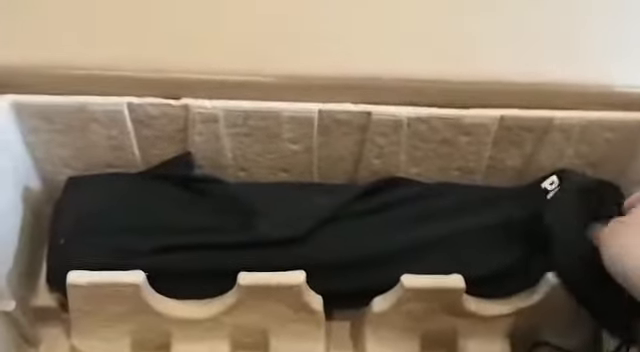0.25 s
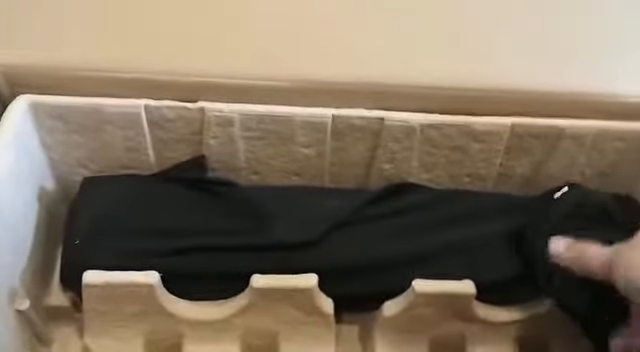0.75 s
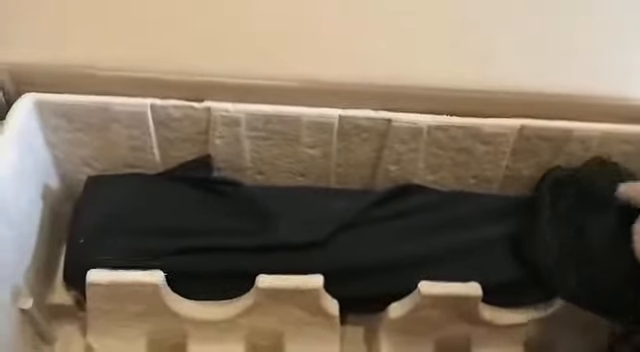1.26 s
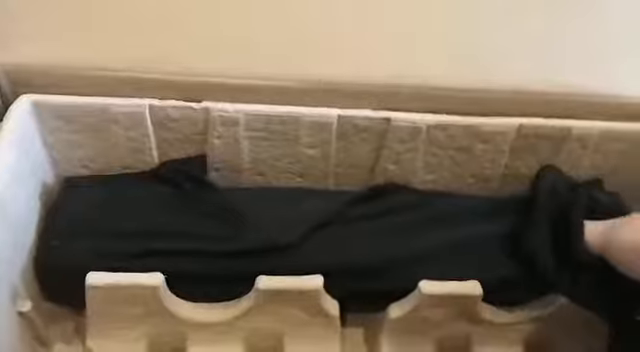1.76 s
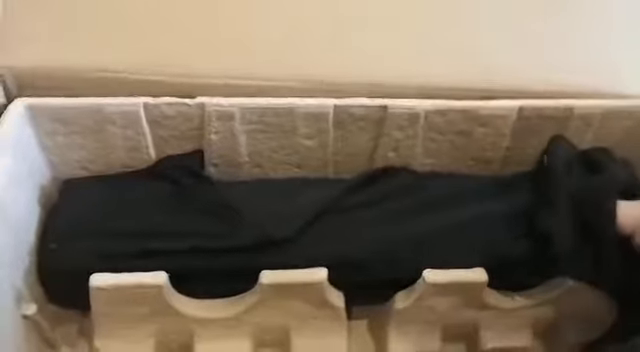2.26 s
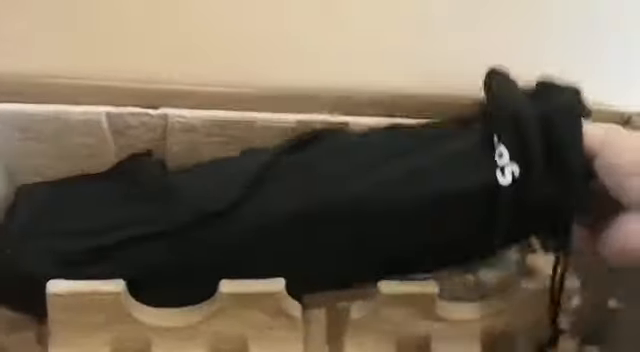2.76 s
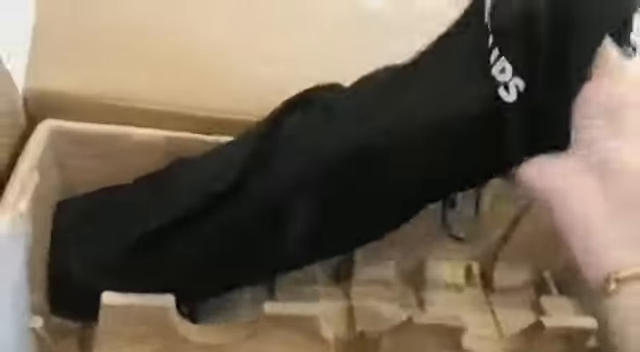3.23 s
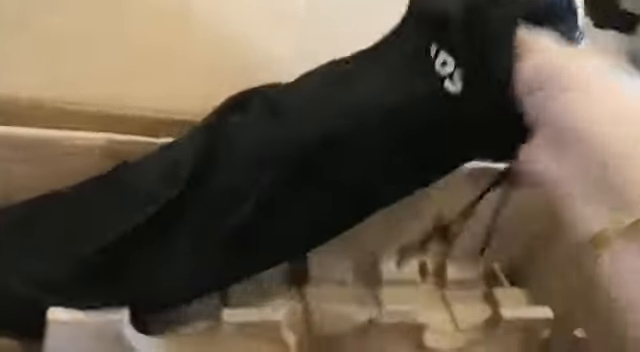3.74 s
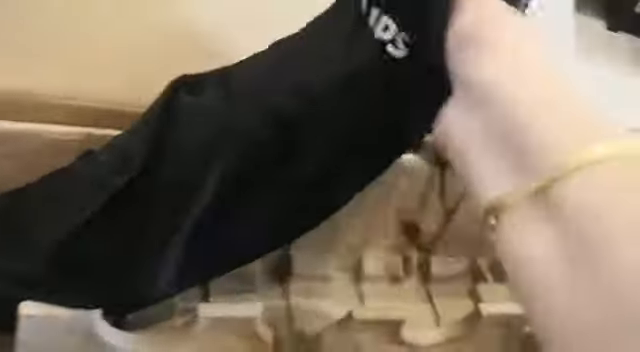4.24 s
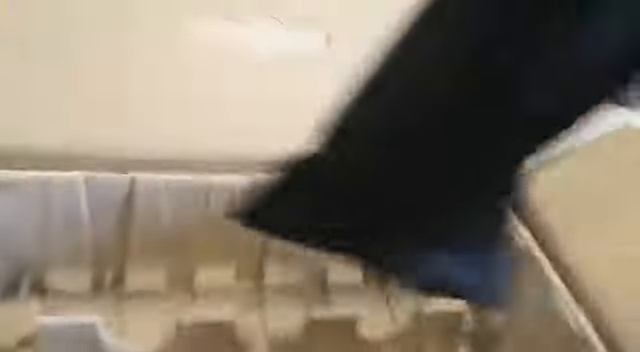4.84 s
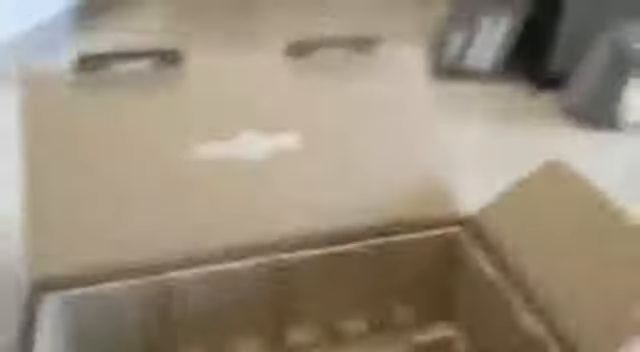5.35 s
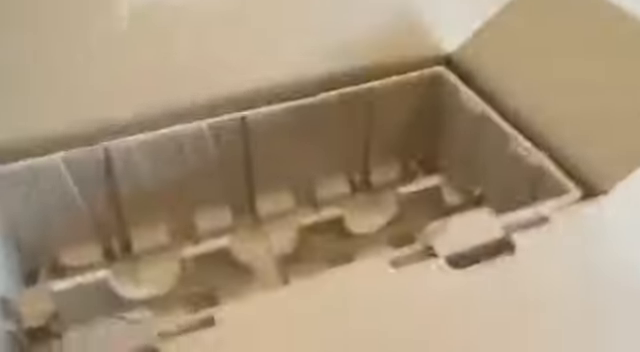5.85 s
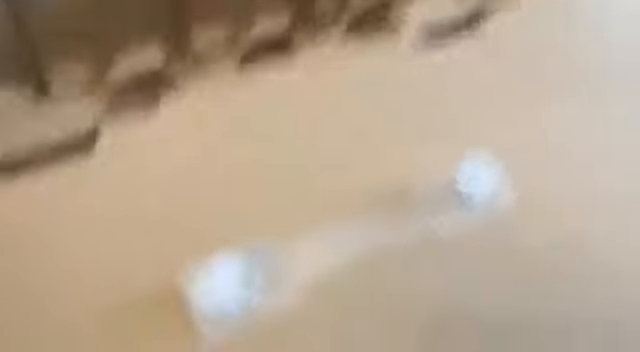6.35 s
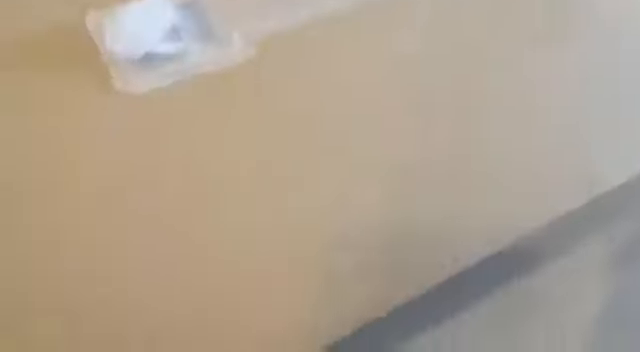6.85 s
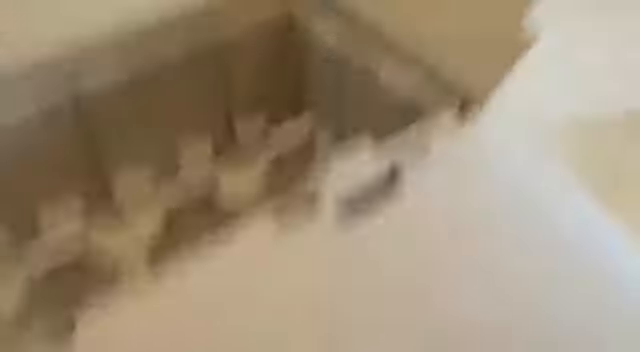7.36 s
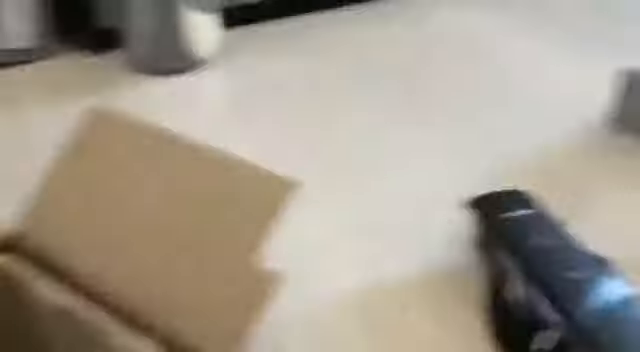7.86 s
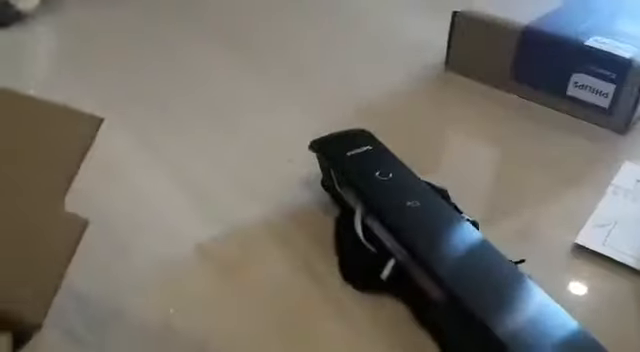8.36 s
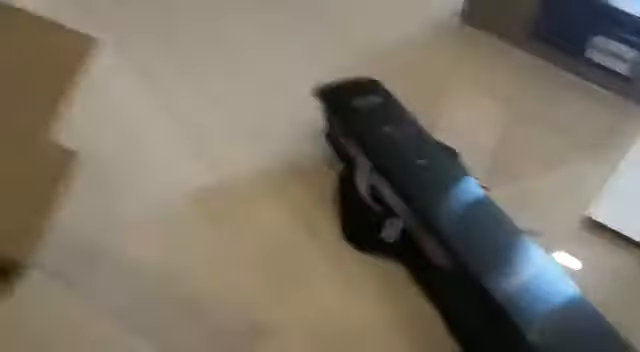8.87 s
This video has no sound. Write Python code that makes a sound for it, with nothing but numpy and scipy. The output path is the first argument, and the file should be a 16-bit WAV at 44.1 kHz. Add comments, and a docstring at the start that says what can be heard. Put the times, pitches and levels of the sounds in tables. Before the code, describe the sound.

Soft cloth rubs, dull cardboard thuds and light ticks up close, interrupted by four hard cracks and one hollow knock off to the right.

```python
"""Four sharp knocks and a hollow one land off to the right: noise bursts through body modes, then a room ring.
They fall while a cloth bag is lifted out of a cardboard box with a pulp tray, close to a hand-held phone.
Near by, decaying noise makes taps and scrapes, and sines with noise make the thuds of the box walls.
Flickering noise makes the sliding cloth and board; slower noise flexes the box and rumbles under the hand.
Behind lie steady air noise and a faint appliance of noise and wavering sines."""
import sys
import numpy as np
from scipy import signal
from scipy.fft import rfft, irfft
from scipy.io import wavfile
from scipy.ndimage import uniform_filter1d

SR = 44100
rng = np.random.default_rng(int(sys.argv[2]) if len(sys.argv) > 2 else 0)


def digitize_waveform(pressure):
    """Quantize a signal to 16-bit integers and store it at the path in sys.argv[1].

    Rows of a 2-D input are taken as channels; values are limited to [-1, 1].
    """
    field = np.atleast_2d(pressure).T
    bounded = np.clip(field, -1, 1)
    quanta = np.round(bounded * 32767).astype(np.int16)
    wavfile.write(sys.argv[1], SR, quanta)


N = 401310
TIME = np.arange(N) / SR  # s, whole scene
AGE = TIME[:SR]  # s, since the start of one short event
TOUCH_S = .0022  # from first touch to full contact of a knock


# hard knocks, with the balance of each blow and two rings of the struck spot:
# contact_s, level_db, thump_db, woody_middle_db, treble_db, ring1_hz, ring1_db, ring2_hz, ring2_db
HARD_KNOCKS = [(2.427, -16, 2, 13, 6, 1844, 9, 7500, 5), (2.8590, -16, -4, 7, 0.5, 1770, 5, 3670, 4.5),
               (5.0774, -13.5, -3, 0.5, -2, 1460, 3.5, 2830, 7),
               (5.5210, -18.5, 0.5, -13.5, 1, 998, 19.5, 2450, -1.5)]
# broad response of the knocked body: frequency_hz, level_db
BODY_RESPONSE = [(50.0, -17), (110.0, -5.5), (250.0, -9), (420.0, -5.5), (600.0, -15.5), (850.0, -3.5),
                 (2000.0, 0.5), (3500.0, -2), (5500.0, -6), (8300.0, -9.5), (10500.0, -18),
                 (15000.0, -19.5)]
# modes of the knocked body: frequency_hz, width_hz, above_broad_response_db
BODY_MODES = [(174, 50, 10.5), (325.4, 110, 11), (526, 9.9, 5), (865, 9.6, 6), (1070, 57, 2.5),
              (1371, 24, -2.5), (1430, 18, 1.5), (1793, 150, 2), (2150, 160, 0.5), (2406, 240, 4),
              (2625, 190, 6), (2880, 240, 2.5), (3050, 72.0, 6.5), (3700, 180, 2.5), (4164, 250, 5.5),
              (4450, 68, -0.5), (4637, 227.0, 6.5), (4880, 180, 4), (6000.0, 70, -0.5), (6900, 300, 4.5),
              (7487, 450, 10.5), (7800, 194.0, 1.5), (8440, 190, 4.5), (9250, 390, 7.5)]


def hard_knocks():
    """Four blows on one body; the place and force of each shift the balance of its modes."""
    out, hz = np.zeros((2, N)), bins(SR)
    body_db = response(BODY_RESPONSE, BODY_MODES)
    for s, db, thump_db, middle_db, treble_db, hz1, db1, hz2, db2 in HARD_KNOCKS:
        thump = thump_db * bump(hz, 240, 380)
        middle = middle_db * bump(hz, 950, 500)
        treble = treble_db * hz ** 2 / (hz ** 2 + 5500 ** 2)
        spot = db1 * bump(hz, hz1, 250) + db2 * bump(hz, hz2, 350)
        # coarse unevenness fades in toward 1500 Hz, fine unevenness is everywhere
        uneven_db = 1.4 * ripple(110) * np.minimum(hz / 1500, 1) + 1.3 * ripple(30)
        knock = ring(blow(), body_db + thump + middle + treble + spot + uneven_db)
        add(out, s - TOUCH_S, undb(db) * knock)
    return out


# broad response of the large panel: frequency_hz, level_db
PANEL_RESPONSE = [(50.0, -38), (110.0, -10.5), (250.0, 2.5), (420.0, -10), (600.0, -27), (850.0, -22),
                  (2000.0, -11), (3500.0, -14), (5500.0, -15.5), (8300.0, -21.5), (10500.0, -29.5),
                  (15000.0, -34.5)]
# modes of the large panel: frequency_hz, width_hz, above_broad_response_db
PANEL_MODES = [(231.0, 68.0, -1), (366, 71, 8), (852.0, 167.0, 9), (1268.0, 208.0, 7.5),
               (2928.0, 470, 11.5), (3280, 341.0, 11), (4306.0, 396.0, 3.5), (6489.0, 590.0, 4),
               (7370, 552.0, 9)]


def hollow_knock(contact_s=6.5675, level_db=-14):
    """One blow on a large panel, whose strong low response sounds hollow."""
    out = np.zeros((2, N))
    knock = ring(blow(), response(PANEL_RESPONSE, PANEL_MODES))
    add(out, contact_s - TOUCH_S, undb(level_db) * knock)
    return out


def blow(crack_db=5, crack_t60=0.022, touch_db=-11, wall_db=3, wall_s=.0056, wall_t60=0.041, room_db=-0.5):
    """An edge touches, the face cracks from the right, the left wall echoes, then the room rings."""
    crack = place(rng.standard_normal(SR) * fade(crack_t60), pan_db=-7, lag_s=.0005)
    wall_decay = np.roll(fade(wall_t60), int(wall_s * SR))
    walls = diffuse(SR) * wall_decay * undb([[0], [-2]])  # 2 dB weaker on the right
    landing = undb(crack_db) * crack + undb(wall_db) * walls + undb(room_db) * room_tail(build_s=0.0049)
    touch = place(rng.standard_normal(SR) * fade(.02), pan_db=-6, lag_s=.0005)
    return undb(touch_db) * touch + np.roll(landing, int(TOUCH_S * SR), axis=1)


# ring of the hard-floored room: frequency_hz, t60_s
ROOM_DECAY = [(100, .63), (260, 0.69), (700, 0.74), (1840, 0.66), (4850, 0.61), (8000, 0.57), (13000, 0.41)]


def room_tail(build_s):
    """Reflections thicken, then each band dies at its own rate."""
    noise = rfft(diffuse(SR))
    centres, t60s = np.transpose(ROOM_DECAY)
    tail = 0
    for weights, t60 in zip(np.eye(len(t60s)), t60s):
        # each band overlaps its neighbours, and the bands add up to the whole noise
        band = along(np.c_[centres, weights], bins(SR))
        tail = tail + irfft(noise * band) * fade(t60)
    return tail * (1 - np.exp(-AGE / build_s))


# strokes of cloth over board: middle_s, length_s, cloth_hiss_db, rubbed_board_db, flexing_box_db
CLOTH_STROKES = [(.12, 0.11, -64, -58.5, -52), (.50, 0.27, -53, -51, -46), (.70, 0.11, -63.5, -55.5, -51),
                 (1.13, 0.19, -48, -50.5, -47), (1.315, 0.1, -55, -50.5, -46.5),
                 (1.47, 0.086, -59, -55.5, -56), (1.77, 0.24, -56.5, -45, -50),
                 (2.2, 0.13, -60, -54.5, -56), (2.39, 0.14, -53, -48.5, -45.5),
                 (3.48, 0.43, -53.5, -57, -63.5), (4.26, 0.22, -57, -59, -72),
                 (4.83, 0.069, -73.5, -58, -66), (6.26, 0.14, -53.5, -53.5, -53),
                 (6.48, 0.13, -76.5, -58, -56), (7.02, 0.53, -63.5, -56.5, -58),
                 (7.25, 0.15, -57, -65, -59), (8.32, 0.48, -51, -49, -53.5), (8.52, 0.39, -82, -57.5, -59),
                 (8.97, 0.46, -71, -63, -52.5)]
# colour of the cloth hiss: frequency_hz, level_db
CLOTH_COLOUR = [(1200, -28), (2800, 5), (5000, 3), (7800, 0.5), (10000, -13.5), (15000, -23)]
# colour of the rubbed board: frequency_hz, level_db
BOARD_COLOUR = [(250, -9.5), (600, -5.5), (950, 0.5), (1400, -2.5), (1950, 3.5), (2800, -2), (5000, -30.5)]


def sliding(rest_cloth_db=-72, rest_board_db=-62):
    """Fibres catch and slip in tiny grains; the board under them answers lower."""
    hiss = effort(CLOTH_STROKES, 0, rest_cloth_db)
    rub = effort(CLOTH_STROKES, 1, rest_board_db)
    # fast grains ride on slower unevenness
    cloth = wash(CLOTH_COLOUR) * undb(0.97 * walk(640) + .6 * walk(44))
    board = wash(BOARD_COLOUR) * undb(1.4 * walk(250) + 2.0 * walk(30))
    return hiss * banded(cloth, depth_db=1.8) + rub * banded(board, depth_db=1.8)


# scrapes of the bag and hand on cardboard: start_s, level_db, centre_hz, sharpness (no unit), rise_s, t60_s
BROAD_SCRAPES = [(1.294, -37.5, 1530, 1.6, 0.013, 0.15), (1.606, -44, 2020, 0.922, 0.089, 0.41),
                 (1.710, -39.5, 3700, 1.05, .014, 0.38), (1.845, -43, 1740, 0.73, 0.033, 0.13),
                 (3.054, -29, 1940, 0.96, 0.0032, 0.6), (4.350, -44, 1610, 0.68, 0.017, 0.43)]


def scrapes():
    """The bag catches in grainy slips, heard through a broad band of the board."""
    out, hz = np.zeros((2, N)), bins(SR)
    for s, db, centre, sharpness, rise_s, t60 in BROAD_SCRAPES:
        colour_db = 2 * band_db(hz, centre, sharpness) + along(SOFT_TREBLE, hz) + 2 * ripple(200)
        add(out, s, undb(db) * ring(friction(rise_s, t60), colour_db))
    return out


# rubs with three narrow rings of the board:
# start_s, level_db, rise_s, t60_s, lower_ring_hz, main_ring_hz, upper_ring_hz, upper_ring_db
RINGING_RUBS = [(1.03, -47.5, .1, .4, 1900, 2380, 5300, -2),
                (4.036, -48, .008, 0.49, 2620, 4350, 6560, -6.5),
                (4.966, -42.5, .09, 0.41, 1710, 2350, 4680, -6.5),
                (6.151, -44.5, .008, 0.48, 2300, 3080, 4900, -3),
                (7.05, -53, .21, .34, 2100, 2500, 5500, -12), (8.36, -52, .1, 0.59, 1580, 1880, 3500, -12)]


def rubs(sharpness=5.5, tilt_db_per_octave=-4):
    """Rubs with three narrow rings: grainy noise through three resonances of the board."""
    out, hz = np.zeros((2, N)), bins(SR)
    for s, db, rise_s, t60, lower, main, upper, upper_db in RINGING_RUBS:
        rings = 0
        for centre, ring_db in [(lower, 0), (main, 0), (upper, upper_db)]:
            rings = rings + undb(ring_db + 2 * band_db(hz, centre, sharpness))
        slope_db = tilt_db_per_octave * np.log2(hz / main)
        add(out, s, undb(db) * ring(friction(rise_s, t60), 20 * np.log10(rings) + slope_db))
    return out


# soft thuds of the box walls: start_s, level_db, pitch_hz, t60_s
BOX_THUDS = [(.103, -45, 199, 0.26), (.441, -35, 420, 0.23), (0.446, -53, 158, .2),
             (0.51, -39, 287.3, 0.37), (0.563, -30, 128, 0.24), (.665, -40, 121, 0.32),
             (1.289, -37.5, 300, 0.16), (1.326, -33.5, 204, 0.14), (2.514, -30, 251, 0.17),
             (2.529, -23.5, 100, 0.16), (4.816, -49.5, 195, 0.31), (7.575, -43, 196.5, 0.79)]


def thuds(rattle=0.5):
    """A wall of the box swings at its pitch among a crowd of neighbouring modes."""
    out = np.zeros((2, N))
    for s, db, pitch_hz, t60 in BOX_THUDS:
        crowd = ring(diffuse(SR) * fade(t60), 2 * band_db(bins(SR), pitch_hz, q=0.68))
        swing = np.sin(2 * np.pi * pitch_hz * AGE) * fade(t60)
        add(out, s, undb(db) * (rattle * crowd + .8 * swing))
    return out


# light taps of fingers, cord and toggle: start_s, level_db, centre_hz, left_minus_right_db (direct sound)
LIGHT_TAPS = [(0.2757, -41, 1090, -2), (0.3166, -36, 3430, -7), (.4390, -26, 3530, -3),
              (0.5664, -32.5, 4400, -9.5), (4.2660, -44.5, 4600, -6), (4.3501, -32.5, 1573, 0),
              (4.955, -44, 1700, -1.5), (6.257, -42, 3170, -4.5), (7.5638, -49.5, 5540, -5),
              (7.999, -49.5, 3460, -14.5), (8.1738, -41, 3500, -19), (8.2630, -33.5, 2680, -20),
              (8.5015, -43.5, 2250, -19), (8.644, -47, 2750, -11), (8.7892, -40.5, 2500, -13),
              (8.8365, -45.5, 1840, -17.5), (8.9383, -44, 2160, -17)]
# soft materials give little top, in taps and scrapes alike: frequency_hz, level_db
SOFT_TREBLE = [(7500, 2.5), (10500, -5), (15000, -21)]


def taps(t60_s=.017, room_db=-22):
    """Short, well-damped ticks close to the phone, with little room."""
    out, hz = np.zeros((2, N)), bins(SR)
    for s, db, centre, pan_db in LIGHT_TAPS:
        direct = place(rng.standard_normal(SR), pan_db)
        tick = (direct + .5 * diffuse(SR)) * fade(t60_s)
        tick = tick + undb(room_db) * room_tail(build_s=0.0013)
        colour_db = 1.5 * band_db(hz, centre, q=1) + along(SOFT_TREBLE, hz) + 3 * ripple(350)
        add(out, s, undb(db) * ring(tick, colour_db))
    return out


# colour of the flexing box: frequency_hz, level_db
FLEX_COLOUR = [(50, -11), (100, 4.5), (150, 5.5), (230, -3), (350, -6), (520, -14.5), (900, -44)]


def flexing(rest_db=-57):
    """The box bends under each stroke: unsteady low noise that swells with the cloth."""
    return effort(CLOTH_STROKES, 2, rest_db) * wash(FLEX_COLOUR) * undb(1.5 * walk(8.1))


# shifts of the hand on the phone: middle_s, length_s, rumble_db
HAND_SHIFTS = [(.75, 0.28, -48), (1.13, 0.28, -46), (2.48, .18, -49), (5.43, .16, -47.5), (6.38, 0.7, -46),
               (8.34, 0.6, -47), (9.07, 0.12, -41.5)]
# colour of the hand rumble: frequency_hz, level_db
RUMBLE_COLOUR = [(12, -10), (29, 4.5), (42, -1), (80, -17), (160, -30), (400, -60)]


def hand_rumble(rest_db=-54.5):
    """The hand shifts on the phone in swells of very low noise."""
    return effort(HAND_SHIFTS, 0, rest_db) * wash(RUMBLE_COLOUR)


# colour of the room air, shared by the rush of the appliance: frequency_hz, level_db
AIR_COLOUR = [(18, -31), (30, 0), (200, -13), (267, -18.5), (355, -14.5), (662, -19), (1000, -10.5),
              (1170, -29.5), (1870, -24.5), (4310, -34), (7240, -31), (10200, -49), (15000, -60)]


def room_air(level_db=-64):
    """Quiet air of the room: steady noise from all sides, strongest in the bass."""
    return undb(level_db) * wash(AIR_COLOUR)


# tones of the appliance: frequency_hz, level_db (before the common hum level)
HUM_TONES = [(183.0, -63), (2116, -75), (2428, -76)]


def appliance(fan_db=-64, hum_db=-3):
    """Faint rush and tones wavering in level and phase, placed right by reaching the left port later."""
    hum = 0
    for hz, db in HUM_TONES:
        level = undb(db + 0.87 * walk(1.0))
        hum = hum + level * np.sqrt(2) * np.sin(2 * np.pi * hz * TIME + 1.2 * walk(4.7))
    right = undb(hum_db) * hum + undb(fan_db) * wash(AIR_COLOUR)[0]
    left = np.roll(right, int(.00055 * SR))
    return np.array([left, right])


def effort(moves, column, rest_db, edge_db=6.5, swell_power=1.8):
    """Gain of one layer: each movement swells and dies alike, edge_db down at its ends, above a rest."""
    power = undb(rest_db) ** 2
    for s, length, *levels in moves:
        drop_db = edge_db * np.abs(2 * (TIME - s) / length) ** swell_power
        power = power + undb(levels[column] - drop_db) ** 2
    return np.sqrt(power)


def friction(rise_s, t60, grain_db=2):
    """Grainy slips that build while a surface catches and die away as it comes free."""
    push = np.minimum(AGE / rise_s, undb(-60 * (AGE - rise_s) / t60))
    grains = unit(undb(grain_db * walk(300)))[:SR]
    return push * diffuse(SR) * grains


def banded(x, depth_db):
    """A fixed random ripple gives the sliding noise a banded colour."""
    bands_db = depth_db * np.interp(bins(N), bins(SR), ripple(170))
    return unit(irfft(rfft(x) * undb(bands_db), N))


def response(broad, modes):
    """A body's response in dB: modes standing on a broad slope."""
    hz = bins(SR)
    return along(broad, hz) + sum(db * bump(hz, f, width) for f, width, db in modes)


def ripple(spacing_hz):
    """Random unevenness of a response, with a spread near one."""
    return 1.2 * np.interp(bins(SR) / spacing_hz, np.arange(1000), rng.standard_normal(1000))


def ring(x, db):
    """Pass x through a causal resonator with this dB response and unit power gain."""
    # folding the cepstrum forward makes the response minimum-phase
    cepstrum = irfft(np.log(unit(undb(db))))
    cepstrum[1:SR // 2] *= 2
    cepstrum[SR // 2 + 1:] = 0
    return irfft(rfft(x) * np.exp(rfft(cepstrum)))


def bump(hz, centre, width):
    """Shape of one resonance, one at its centre."""
    return 1 / (1 + (2 * (hz - centre) / width) ** 2)


def band_db(hz, centre, q):
    """Response of a broad band-pass in dB."""
    return -10 * np.log10(1 + (q * (hz / centre - centre / hz)) ** 2)


# diffuse sound at the two microphone ports: frequency_hz, side_minus_mid_db
DIFFUSE_WIDTH = [(40, -24), (110, -24), (200, -14.5), (380, -1.5), (700, 3), (1300, -2.5), (2400, 2),
                 (15000, -1)]


def diffuse(size):
    """Noise arriving from all sides: alike at both ports in the bass, unrelated in the treble."""
    mid, side = rfft(rng.standard_normal((2, size)))
    width = undb(along(DIFFUSE_WIDTH, bins(size)))
    ports = mid + np.array([[1], [-1]]) * width * side
    return irfft(ports / np.sqrt(1 + width ** 2), size)


def wash(points):
    """Endless diffuse noise of the given colour."""
    return unit(irfft(rfft(diffuse(N)) * undb(along(points, bins(N))), N))


def walk(rate):
    """Smooth random wandering, rate new values a second, with a spread near one."""
    hold = int(SR / rate)
    steps = np.repeat(rng.standard_normal(N // hold + 1), hold)
    return unit(uniform_filter1d(steps, hold)[:N])


def fade(t60):
    """A free decay, 60 dB down after t60 seconds."""
    return undb(-60 * AGE / t60)


def place(x, pan_db, lag_s=0):
    """Direct sound at the two ports; a positive lag reaches the left one later."""
    left = np.interp(AGE - lag_s, AGE, x, left=0)
    return np.array([left * undb(pan_db / 2), x * undb(-pan_db / 2)])


def add(out, s, x):
    """Mix x into out from time s."""
    start = int(s * SR)
    out[:, start:start + x.shape[1]] += x[:, :N - start]


def undb(db):
    """Decibels to gain."""
    return 10 ** (np.asarray(db) / 20)


def unit(x):
    """Scale to an rms of one."""
    return x / np.sqrt(np.mean(x ** 2))


def bins(size):
    """Frequencies of a spectrum of this many samples, at least 1 Hz."""
    return np.maximum(np.fft.rfftfreq(size, 1 / SR), 1)


def along(points, hz):
    """Read (Hz, value) points on a log-frequency axis."""
    f, value = np.transpose(points)
    return np.interp(np.log(hz), np.log(f), value)


def suppress(x, threshold_db=-46, knee_db=6, depth_db=2.5):
    """Noise suppression: quiet passages get less gain than loud ones, so tails drop away at the end."""
    upper = signal.sosfilt(signal.butter(2, 600, "high", fs=SR, output="sos"), x)
    power = uniform_filter1d(np.mean(upper ** 2, axis=0), size=1500)
    level_db = 10 * np.log10(power + 1e-12)
    openness = np.clip((level_db - threshold_db) / knee_db, 0, 1)
    return x * undb(depth_db * openness)


def scene():
    """Everything as it reaches the phone."""
    knocking = hard_knocks() + hollow_knock()
    bag_and_box = sliding() + scrapes() + rubs() + thuds() + taps() + flexing()
    return knocking + bag_and_box + hand_rumble() + room_air() + appliance()


def record(dry):
    """The phone suppresses quiet noise, limits hard at full scale and cuts the top."""
    limited = np.clip(suppress(dry), -1, 1)
    top_cut = signal.ellip(10, .2, 90, 15500, fs=SR, output="sos")  # low-pass, Hz
    return signal.sosfilt(top_cut, limited)


dry = scene()
out = record(dry)
digitize_waveform(out)
```